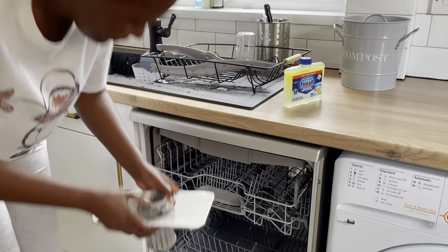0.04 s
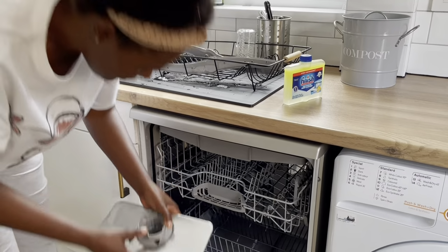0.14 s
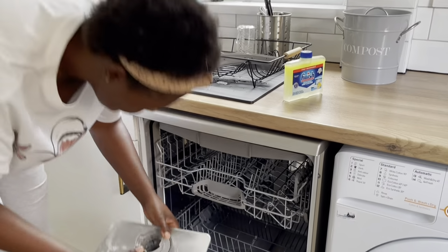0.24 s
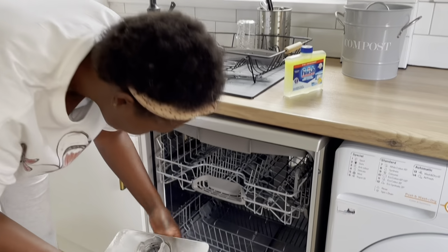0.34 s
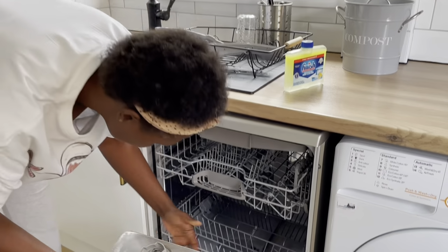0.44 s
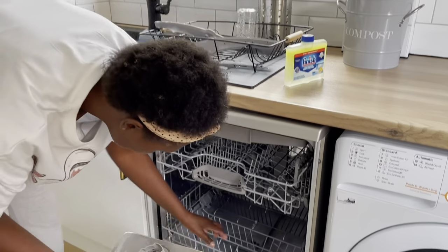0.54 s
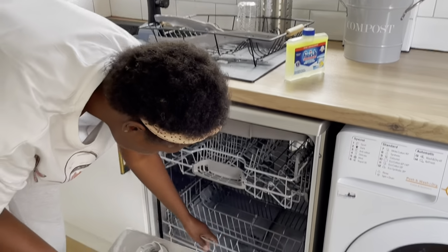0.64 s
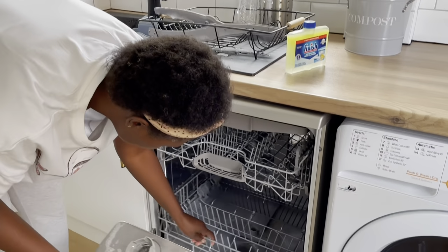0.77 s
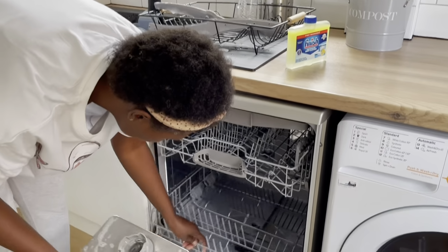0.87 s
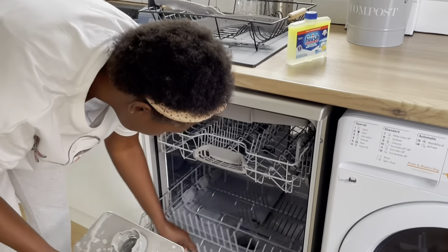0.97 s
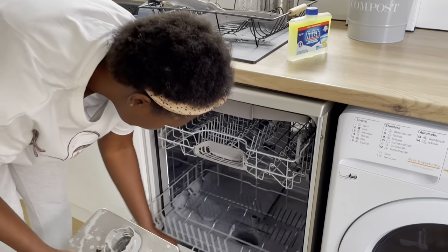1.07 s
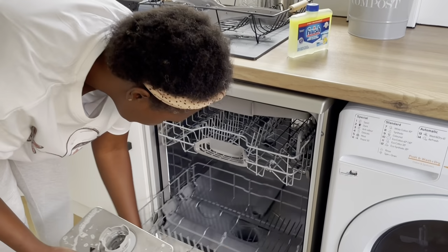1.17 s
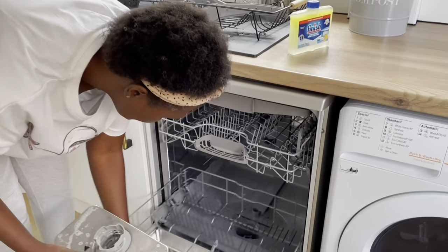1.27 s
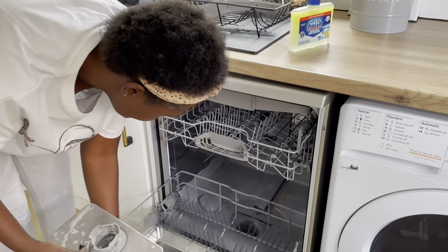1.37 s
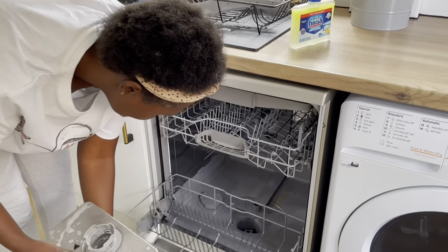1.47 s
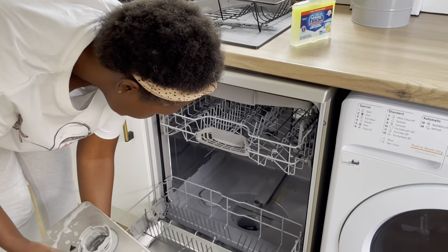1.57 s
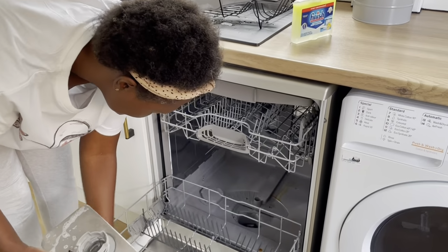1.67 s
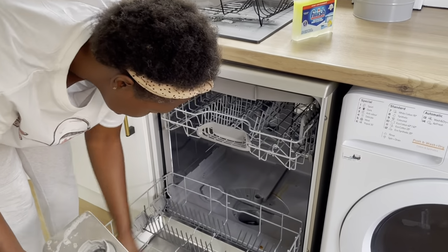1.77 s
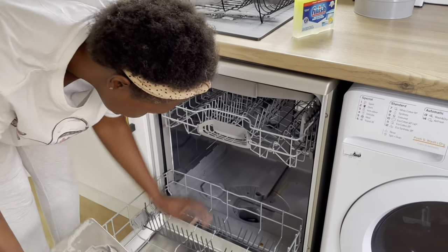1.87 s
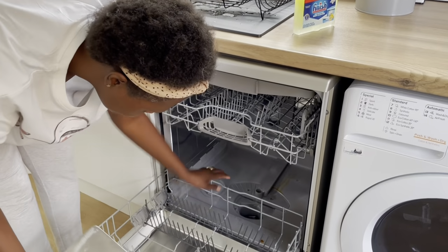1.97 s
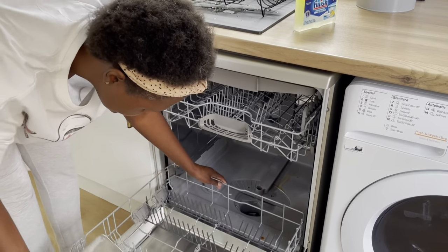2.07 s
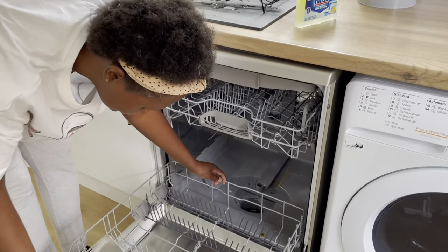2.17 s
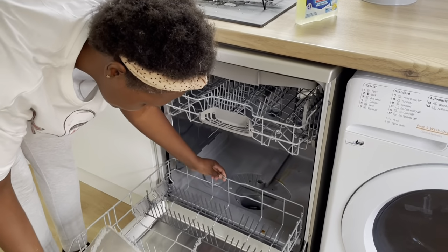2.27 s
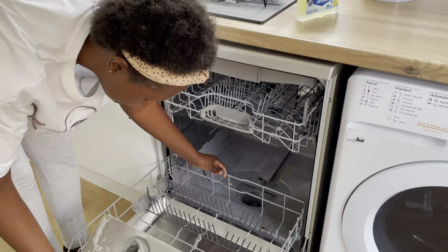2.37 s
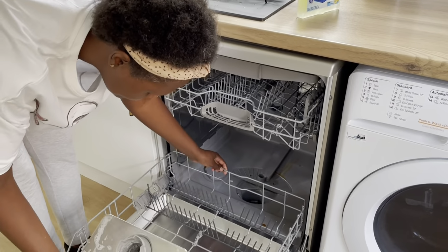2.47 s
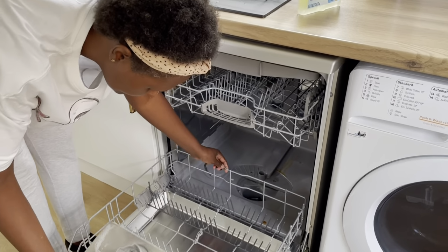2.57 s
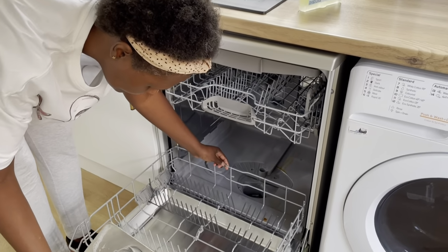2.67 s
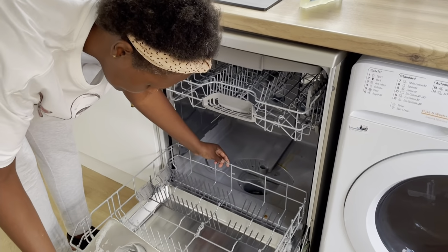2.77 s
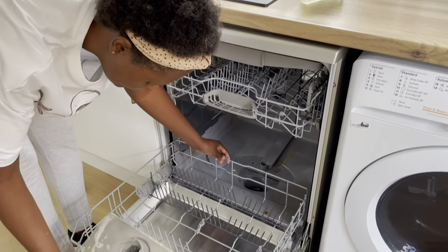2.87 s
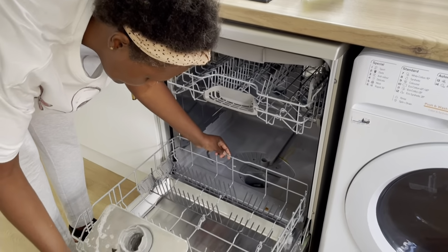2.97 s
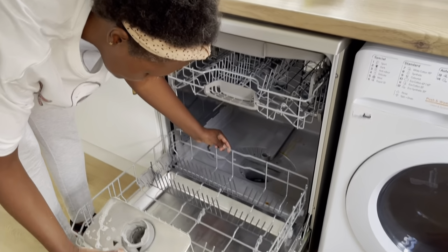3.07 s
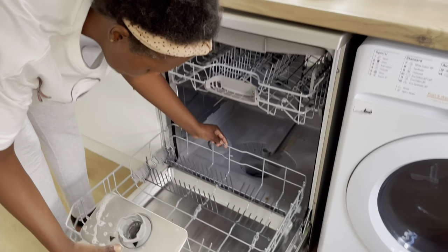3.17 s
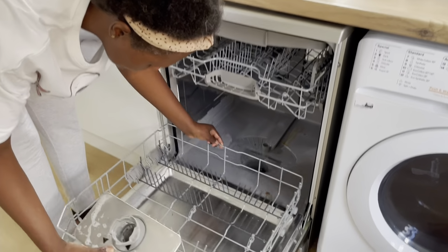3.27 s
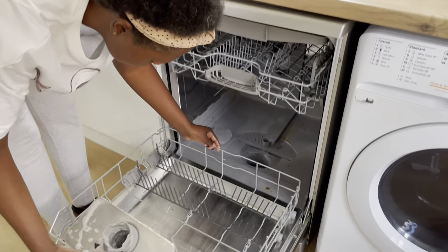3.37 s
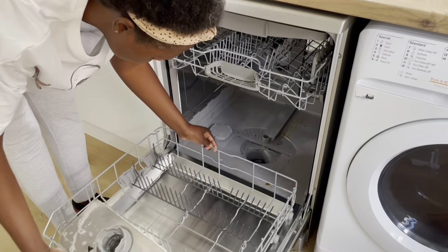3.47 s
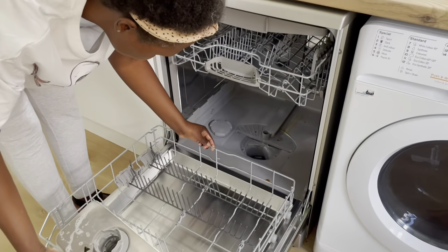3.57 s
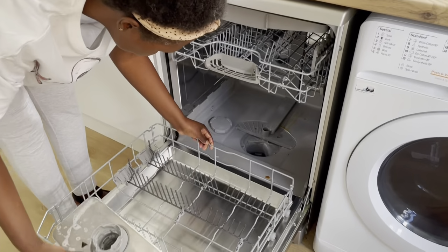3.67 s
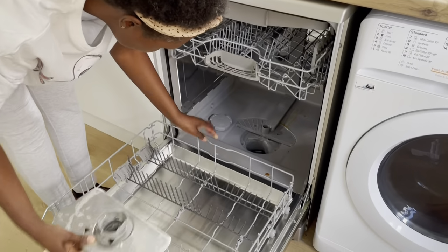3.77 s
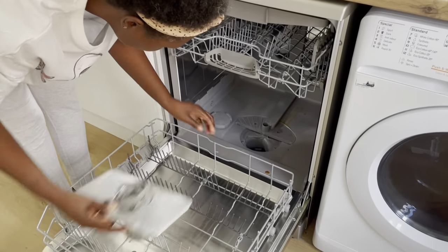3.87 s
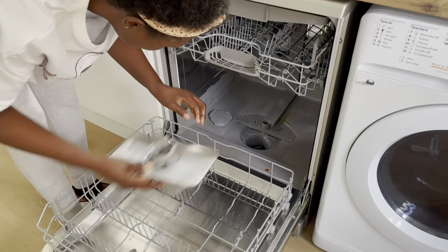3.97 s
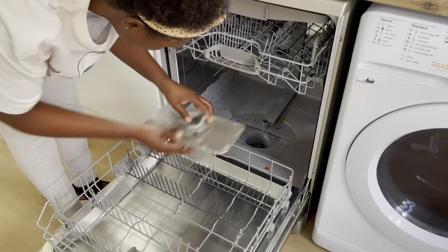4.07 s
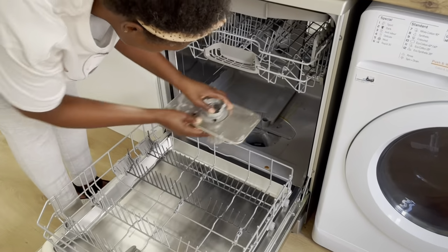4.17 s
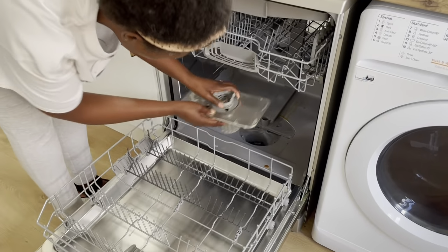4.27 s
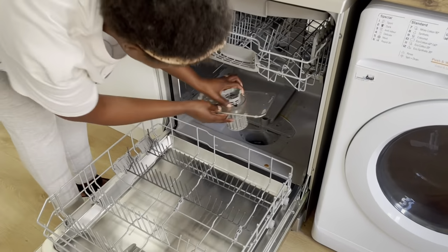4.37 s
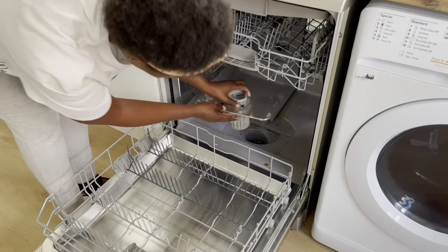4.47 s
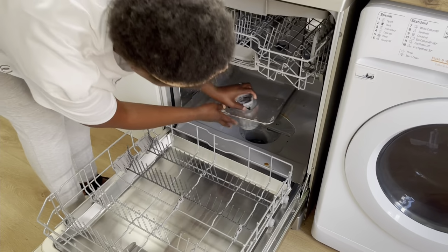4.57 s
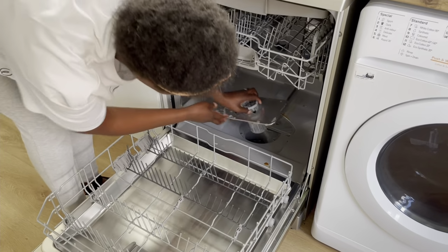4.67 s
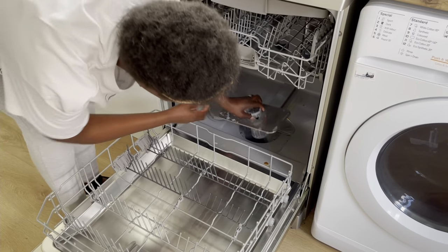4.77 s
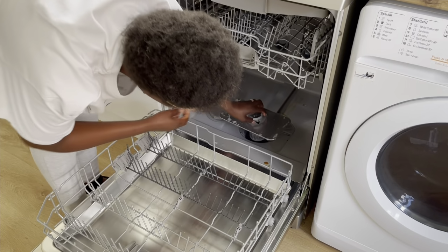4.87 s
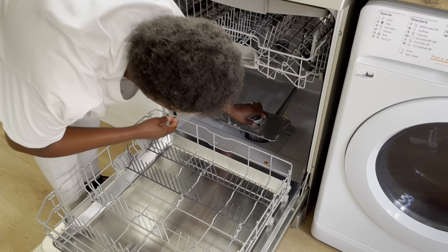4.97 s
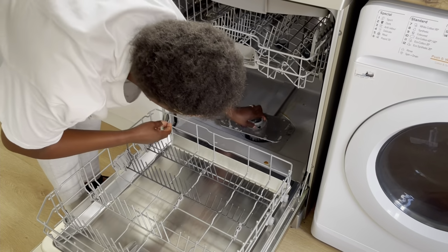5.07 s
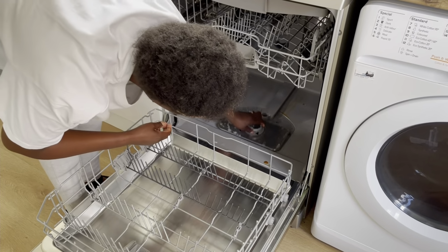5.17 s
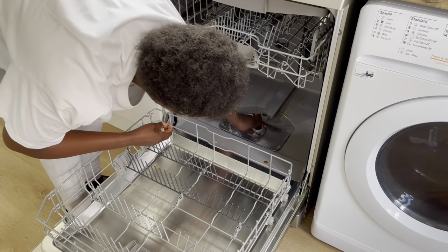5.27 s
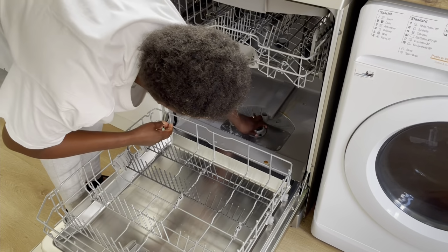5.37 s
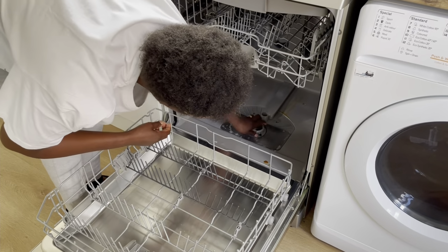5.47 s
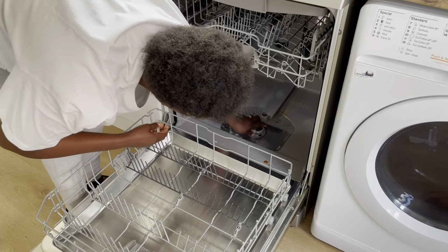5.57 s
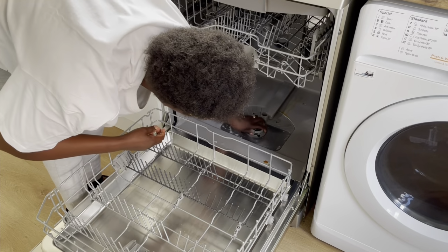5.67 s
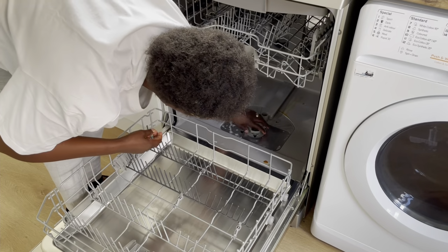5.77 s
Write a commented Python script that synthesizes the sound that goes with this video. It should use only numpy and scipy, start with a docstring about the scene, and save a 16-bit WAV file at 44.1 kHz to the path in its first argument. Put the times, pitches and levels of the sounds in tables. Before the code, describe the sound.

Close stereo sound in a small kitchen: soft clothing rustle and a dry plastic knock, then an empty wire dishwasher rack rolls out with low rumble, scrape and ringing bumps. A few metallic rattles follow, spaced by quiet. After faint handling, a plastic filter clatters and judders into its seat in the hollow steel tub, ending with a woody, hollow thunk. Short room echo and faint hiss.

```python
"""In a small kitchen a plastic filter is briefly handled, then a dishwasher's empty lower rack rolls out onto its door.
The rack's wheels are random grains and its bumps short noise bursts; both set the wire basket ringing.
Later the filter scrapes and clatters into its seat in the steel tub: dry knocks answered by tub resonances.
Low swelling notes, finger rubs and clothes rustle are added, with a short room echo and a quiet background hiss.
"""
import sys
import numpy as np
from scipy import signal
from scipy.fft import rfft, irfft
from scipy.io import wavfile
from scipy.ndimage import uniform_filter1d

SR = 44100
rng = np.random.default_rng(int(sys.argv[2]) if len(sys.argv) > 2 else 0)


def dump(signal):
    """Clip the signal to [-1, 1] and save it as 16-bit WAV at the path in sys.argv[1]."""
    limited = np.clip(np.atleast_2d(signal).T, -1, 1)
    pcm = np.round(limited * 32767).astype(np.int16)
    wavfile.write(sys.argv[1], SR, pcm)


N = 256662
TIME = np.arange(N) / SR

# knocks of the rack's wheels and wires: t/s, level/dB, then thump/dB, tick/dB, body ring/dB and note/dB
# (ring is a gain, the rest are relative to level), note f/Hz, midrange tilt/dB per octave, rebound after t/s or 0
RACK_KNOCKS = [ (.72, -46, -7, -38, -2, 5, 360, -6, 0), (.863, -35.5, -7, -23, -1, 1, 378, 0, .016),
               (.951, -29, -10, -19, 2, -6, 1100, 2.5, 0), (.964, -30, -9, -23, 2, -7, 1600, 2, 0),
               (1.073, -42, -5, -22, 0, -3, 900, 0, .018), (1.179, -45, -5, -22, 1, 0, 462, -1, 0),
               (1.254, -45, -5, -24, 1, 1, 355, -1, 0), (1.555, -41.5, -6, -18.5, 3, -2, 446, -1, 0),
               (1.564, -44, -6, -13, 0, -3, 700, 0, 0), (1.662, -32, -5, -12, 4, -6, 1792, 0, .015),
               (1.694, -31, -3, -11, 4, -13, 4188, -1, 0), (1.728, -28, -3, -14, 2.5, -4, 619, 0, 0),
               (1.762, -27, -2, -15, 2.5, -2, 645, -1, 0), (2.13, -27, -8, -15.5, 4, -2, 441, 1, 0),
               (2.148, -27.5, -6, -21, 2.5, -1, 650, -1, 0), (2.579, -30.5, -6, -19.5, 1.5, 0, 651, -2, 0),
               (2.639, -28, -8, -9.5, 3.5, -3, 877, 1, 0), (3.278, -28, -5.5, -13.5, 1.5, -3, 619, 0, 0),
               (3.384, -23.5, -9, -19, 1.5, -4, 721, 0, 0), (3.416, -28, 1, -11, 4, -7, 2449, 0, 0),
               (3.469, -26, -9, -17.5, 2.5, -6, 1491, -.5, 0), (3.927, -46, -8, -22, 5, -14, 2664, 0, 0),
               (3.958, -50, -5, -24, 2, -6, 1400, 0, 0), (4.109, -43, -15, -8, 3, -9, 1300, 0, 0),
               (4.128, -45, -9, -9, 0, 0, 400, 0, 0)]
# knocks of the plastic filter: same columns as the rack's knocks
FILTER_KNOCKS = [ (.186, -28.5, -7, -17.5, -9, -5, 420, 1.5, 0), (.431, -41, -4.5, -26, -6, -6, 775, 1, 0),
                 (4.024, -51, -4, -25, -2, -3, 800, 1, .02), (4.288, -54, -5, -23, -6, 1, 457, 0, 0),
                 (4.393, -53, -6, -13, -2, -2, 1760, 2, .018), (4.538, -57, -6.5, -6, -3, 1, 2550, 1, 0),
                 (5.068, -34.5, -11, -18, 2, -2, 554, 0, .025), (5.117, -34, -8, -15, 1, 0, 522, 0, 0),
                 (5.179, -30, -16, -4.5, 3, -5, 1356, 1.5, .018), (5.23, -18, -7, -13, 2, -5, 349, 0, .014),
                 (5.273, -24, -6, -15, 2, -3, 462, -.5, 0), (5.295, -23, -1, -16, 2, -2, 306, 0, 0),
                 (5.325, -26.5, -3, -25, 3, 0, 473, -1, 0), (5.354, -22, -4, -24, 1, -3, 371, 0, 0),
                 (5.581, -25.5, -4, -26, 2, 0, 457, 1.5, 0), (5.664, -39, -2, -26, 0, 1, 420, -3, 0)]
# how a rebound differs from its blow: changes of knock/dB, thump/dB, tick/dB, ring/dB, note/dB
REBOUND_CHANGE_DB = (-2, -1, -6.5, -1.5, -9)
# small bumps under the wheels: thump/dB, tick/dB, ring/dB, note/dB, as in the knock tables
BUMP_SHAPE_DB = (-6, -18, 3, -3)

# tone colour of each sound, only the shape counts: f/Hz, level/dB
RACK_COLOUR = [(30, -21), (65, -5.5), (120, 1), (220, 4), (380, -5), (460, -2.8), (600, -2), (1000, -8),
               (1700, -11), (2800, -14.5), (3500, -20.5), (4500, -21), (7000, -26), (11000, -30.5),
               (15500, -43)]
FILTER_COLOUR = [(30, -43), (65, -13.5), (115, -6), (190, -3), (320, -1), (520, 1), (850, -5), (1350, -7.5),
                 (2000, -15.5), (2800, -15), (3500, -21), (4500, -20.5), (7000, -27), (11000, -31.5),
                 (15500, -48)]
RUMBLE_COLOUR = [(30, -6), (70, 4.5), (110, 10), (220, -2), (400, 0.5), (650, -4), (1100, -20.5),
                 (2500, -58.5)]
GRIT_COLOUR = [(400, -6), (1000, 10), (2200, -3.5), (3200, -6.5), (4000, -13.5), (6000, -21), (15000, -30)]
CLOTH_COLOUR = [(80, 8.5), (500, 9), (1000, -2.5), (2200, 2), (4000, -9), (7000, -11), (11000, -14.5),
                (15500, -20.5)]
QUIET_COLOUR = [(25, 0), (60, 4), (120, -1), (300, -6), (700, -14), (2000, -20), (5000, -27), (15000, -38)]

# clear resonances of the rack and of the steel tub: f/Hz, relative level/dB, time to fall 60 dB t/s
RACK_MODES = [(110, -2.5, .26), (199, 6, .5), (224, -3, 1.2), (250, -9, .9), (310, -5, .6), (442, 3, .23),
              (513, -1, .35), (570, 0, .25), (640, -2, .35), (738, -2, .25), (870, 5, .25), (1050, -2, .35),
              (1115, 0, .35), (1255, -1, .33), (1355, 0, .3), (1780, 2, .4), (2680, 4, .39)]
TUB_MODES = [(63, -1, .4), (150, -5, .18), (228, -6, .9), (312, 5, .4), (347.5, 3, .3), (454.6, 0, .3),
             (530, 3, .4), (692, 2, .33), (789, 4, .25), (833, -1, .4), (958, -6, .45), (1096, -1, .4),
             (1312, 3, .25), (1376, 1, .2), (1500, 0, .2), (1678, -3, .37)]
# dense ringing of the wires, the tub and the room: f/Hz, time to fall 60 dB t/s, relative level/dB
WIRE_RING = [(59, 1.77, 3), (126, 1.01, 3), (250, 1.49, 0), (495, 0.86, -0.5), (990, 0.55, -1.5),
             (2430, 0.62, 2.5), (5300, 0.41, 6), (12000, 0.44, 1)]
TUB_RING = [(60, 0.82, 4.5), (247, 0.41, -1), (1000, 0.57, -1.5), (2500, 0.35, 1.5), (5000, 0.52, 1.5),
            (12200, 0.29, 0)]
KITCHEN_RING = [(125, .75, 0), (1000, 0.22, 0), (12000, 0.45, 0)]
# notes of the filter plate and tub floor at the last push: f/Hz, level/dB, time to fall 60 dB t/s, rise t/ms
SEAT_MODES = [(64, -36, .3, 12), (199, -29, .2, 10), (237, -11.5, .11, 14), (312, -29, .25, 8),
              (457, -22.5, .14, 2), (515, -19.5, .09, 2), (867, -38, .11, 2), (1094, -31, .1, 2),
              (1445, -38, .12, 2)]
# low swelling notes of the filter plate, the knocked wire rack and the steel door or tub: t/s, f/Hz, peak level/dB
LOW_NOTES = [(.02, 400, -34), (.079, 360, -34), (.45, 108.4, -38.5), (.96, 125, -36), (1.355, 97, -39),
             (2.158, 199, -26.5), (2.584, 200, -32.5), (2.655, 203, -33.5), (3.417, 133.5, -28),
             (3.475, 195, -33), (5.088, 66, -35), (5.236, 190, -23), (5.364, 103, -24.5)]

# rack scraping along its guides: peak t/s, level/dB, t to rise 20 dB/s, t to fall 20 dB/s
SCRAPES = [(.72, -53, .025, .1), (.835, -48, .08, .2), (.925, -47.5, .06, .1), (.99, -46, .1, .47),
           (1.46, -53, .06, .15), (1.775, -38.5, .15, .13)]
# clothes rustling with each bend and reach: same columns as the scrapes
MOVES = [(.01, -50, .3, .62), (.45, -49.5, .3, .12), (.73, -59, .15, .2), (1.42, -54, .9, 1.17),
         (2.015, -60, .03, .8), (4.05, -64.5, .2, 1.6), (4.5, -58.5, .9, 1.0), (5.74, -52, .36, .5)]
# tiny ticks as the filter shifts in the hands: same columns as the scrapes
FUMBLES = [(.26, -53, .4, .35), (4.04, -61, .03, .6)]
# wheels creaking as they break free: columns of the scrapes, then f/Hz
WHEEL_CREAKS = [(.727, -47, .028, .06, 720), (.765, -47, .06, .08, 470)]
# filter juddering as it is twisted into its seat: columns of the scrapes, then f/Hz
JUDDERS = [(5.312, -27, .12, .09, 340), (5.35, -30, .08, .05, 520)]
# fingers rubbing the filter's plate as the grip shifts: columns of the scrapes, then plate f/Hz
GRIPS = [(.05, -42.5, .3, .2, 340), (.26, -51, .04, .07, 560), (.345, -52, .06, .07, 500),
         (.435, -50.5, .06, .07, 470), (4.24, -58, .05, .08, 520), (4.48, -61, .08, .12, 600)]

# the two microphone openings, gain of the left-right difference: f/Hz, level/dB
STEREO_WIDTH = [(60, -19), (125, -17.5), (250, -9.5), (500, -3.5), (1500, -2), (5000, -4), (7000, -3.5),
                (8200, -22.5), (9800, 2.5), (11500, -27), (13000, -3.5), (15000, -15)]
# how far the left opening is ahead of the right: f/Hz, phase/rad
LEFT_LEAD = [(5500, 0), (7000, 1.3), (7800, 3.0), (8600, 3.25), (10000, 4.9), (11000, 6.15), (12100, 6.4),
             (13300, 7.5), (14000, 9.38), (16000, 9.44)]

# one steady pull: the rolling sound starts, rises over the attack, then fades from the stop on
ROLL_START_S, ROLL_ATTACK_S, ROLL_STOP_S, ROLL_RELEASE_S = .685, .022, 1.756, .15
GATHER_S, GATHER_DB = .25, 2.5  # time to reach full speed; how much quieter the rolling starts
RUMBLE_DB, GRIT_DB = -45.5, -58
SLOW_GRIT_HZ = 1800  # a slow scrape stays mostly below this; treble joins with speed
DOOR_S, DOOR_DB = 1.57, 5.5  # the rumble grows as the wheels run onto the hollow door
BUMPS_PER_S, LOUDEST_BUMP_DB, LOWEST_BUMP_HZ, BUMP_TILT_DB = 7, -49.5, 450, -1.5  # tilt per octave
NOTE_DB, NOTE_T60_S = -16, .025  # each struck spot also rings briefly on its own note
FIRM_TICK_DB, SOFT_MS_PER_DB = -20, .34  # blows with less tick than this rise more slowly
LOW_NOTE_RISE_CYCLES = 2.16
SEAT_S = 5.582
QUIET_DB = -67.5
TOP_HZ = 14400


def rack():
    """Wheels rumble, bump and scrape along their track, and this shaking sets the wire basket ringing."""
    blows = knocks(RACK_KNOCKS, rise_ms=.26) + knocks(bumps(), rise_ms=1.2)
    direct, spots = strike(blows, RACK_COLOUR, gains_db=(-13.5, -11.5, -10.5), t60s=(.04, .07, .035),
                           snap=9.7, spread=.82, lag=1.756, rattle=.65)
    speed = np.clip((TIME - ROLL_START_S) / GATHER_S, 0, 1)
    fade_in = (TIME - ROLL_START_S) / ROLL_ATTACK_S
    fade_out = 1 - (TIME - ROLL_STOP_S) / ROLL_RELEASE_S
    rolling = np.clip(np.minimum(fade_in, fade_out), 0, 1) * undb(-GATHER_DB * (1 - speed))
    rumble = wheel_rumble(rolling)
    grit = guide_grit(rolling, speed)
    # every spot of the basket stirs its own mixture of wire notes; the clear modes answer all spots
    drives = spots + undb(-11.5) * grit[:1]
    wires = sum(resonate(drive, dense_ring(WIRE_RING)) for drive in drives)
    bending = resonate(spots.sum(axis=0) + undb(-2.5) * rumble, mode_ring(RACK_MODES))
    return direct + rumble + grit + creaks(WHEEL_CREAKS) + undb(-1.0) * wires + undb(-17.5) * bending


def wheel_rumble(rolling):
    """Many tiny hits under the rolling wheels blur into a low rumble, louder on the hollow door."""
    on_door = uniform_filter1d(1. * (TIME > DOOR_S), size=2048)
    rumble = unit(colour(grains(rate=2000, scatter_db=2.0), RUMBLE_COLOUR))
    return rumble * rolling * undb(RUMBLE_DB + DOOR_DB * on_door)


def guide_grit(rolling, speed):
    """Sparse hits make a gritty scrape along the guides, brighter at higher speed."""
    grit = unit(colour(grains(rate=520, scatter_db=3.0), GRIT_COLOUR))
    grit = grit * np.hypot(rolling * speed * undb(GRIT_DB), swells(SCRAPES))
    treble = butter(grit, SLOW_GRIT_HZ, "high")
    grit = butter(grit, SLOW_GRIT_HZ, "low") + speed ** 2 * treble
    return grit * flutter(rate=45, depth_db=2.2)  # the wheels catch and run free


def bumps():
    """Wheels at full speed meet small bumps: one at a chance moment in each equal slot before the door."""
    start = ROLL_START_S + GATHER_S
    count = round(BUMPS_PER_S * (DOOR_S - start))
    table = []
    for k, (when, weak, spot) in enumerate(rng.random((count, 3))):
        s = start + (k + when) / BUMPS_PER_S
        note_hz = LOWEST_BUMP_HZ * 2 ** spot
        table.append((s, LOUDEST_BUMP_DB - 6 * weak, *BUMP_SHAPE_DB, note_hz, BUMP_TILT_DB, 0))
    return table


def plastic_filter():
    """Dry plastic knocks and juddering shake the air; the knocks also ring the hollow steel tub."""
    blows = knocks(FILTER_KNOCKS, rise_ms=.55)
    direct, spots = strike(blows, FILTER_COLOUR, gains_db=(-13.5, -11, -10), t60s=(.05, .07, .04),
                           snap=6.8, spread=.34, lag=1.307, rattle=.61)
    hollow = sum(resonate(drive, dense_ring(TUB_RING)) for drive in spots)
    walls = resonate(spots.sum(axis=0), mode_ring(TUB_MODES))
    return direct + creaks(JUDDERS) + undb(-1.5) * hollow + undb(-16.5) * walls


def seat(size=16384):
    """Pressing the filter home gives a quick woody knock of its plate and a slower hollow tub note."""
    out, t = np.zeros((2, N)), np.arange(size) / SR
    for hz, db, t60, rise_ms in SEAT_MODES:
        envelope = (1 - np.exp(-t * 1000 / rise_ms)) * decay(t, t60)
        phase = rng.uniform(-.4, .4, (2, 1))
        add(out, SEAT_S, undb(db) * envelope * np.sin(2 * np.pi * hz * t + phase))
    return out


def low_notes(size=16384):
    """Filter plate, wire rack and steel door or tub swell and die away on low notes; lower ones are slower."""
    out, t = np.zeros((2, N)), np.arange(size) / SR
    for s, hz, db in LOW_NOTES:
        rise = LOW_NOTE_RISE_CYCLES / hz
        envelope = t / rise * np.exp(1 - t / rise)
        add(out, s, (undb(db) * envelope * np.sin(2 * np.pi * hz * t))[None])
    return out


def grip():
    """Fingertips rub the thin plate, which answers with a low creak and tiny dry ticks."""
    ticks = colour(grains(rate=420, scatter_db=2.0), FILTER_COLOUR)
    ticks = unit(butter(ticks, hz=850, kind="high"))
    return creaks(GRIPS) + ticks * swells(FUMBLES)


def clothes():
    """Cotton sliding over itself makes countless tiny hits: a fine rustle that swells with each move."""
    rustle = unit(colour(grains(rate=5000, scatter_db=1.5), CLOTH_COLOUR))
    return rustle * swells(MOVES) * flutter(rate=25, depth_db=1.3)


def kitchen_echo(near):
    """The room answers with a short, dense echo, unrelated left and right."""
    return undb(-17) * resonate(near, dense_ring(KITCHEN_RING))


def quiet_background():
    """Steady, faint noise with more bass than treble."""
    return undb(QUIET_DB) * unit(colour(rng.standard_normal((2, N)), QUIET_COLOUR))


def knocks(table, rise_ms):
    """Dull blows rise slowly and loose parts fall back once; gives a list of blows for strike."""
    blows = []
    for s, db, thump_db, tick_db, ring_db, note_db, note_hz, tilt_db, rebound_s in table:
        rise = rise_ms + SOFT_MS_PER_DB * max(FIRM_TICK_DB - tick_db, 0)
        levels_db = np.array([db, db + thump_db, db + tick_db, ring_db, db + note_db])
        blows.append((s, *levels_db, note_hz, tilt_db, rise))
        if rebound_s > 0:
            blows.append((s + rebound_s, *(levels_db + REBOUND_CHANGE_DB), note_hz, tilt_db, rise))
    return blows


def strike(blows, spectrum, gains_db, t60s, snap, spread, lag, rattle, count=4):
    """Each blow is heard directly, and also pushes the body at one of a few spots."""
    direct, spots = np.zeros((2, N)), np.zeros((count, 1, N))
    for k, (s, *levels_db, ring_db, note_db, note_hz, tilt_db, rise_ms) in enumerate(blows):
        bands_db = np.add(levels_db, gains_db)
        heard, push = contact(spectrum, bands_db, tilt_db, rise_ms, t60s, snap, spread)
        t = TIME[:heard.shape[1]]
        note = (1 - np.exp(-t * note_hz)) * decay(t, NOTE_T60_S) * np.sin(2 * np.pi * note_hz * t)
        heard = heard + undb(NOTE_DB + note_db) * unit(note)
        # the chatter pushes too, so each blow favours its own resonances
        push = np.sqrt(1 - rattle) * push + np.sqrt(rattle) * heard.mean(axis=0)
        add(direct, s, disperse(heard, lag))
        add(spots[k % count], s, disperse(push, lag) * undb(ring_db))
    return direct, spots


def contact(spectrum, levels_db, tilt_db, rise_ms, t60s, snap, spread, size=6144):
    """A blow is a snap plus noisy chatter in three bands (knock, thump, tick), and a push into the body."""
    t = np.arange(size) / SR
    sides = np.array([[1], [-1]])
    mid, side = rng.standard_normal((2, size))
    chatter = (1 - np.exp(-t * 1000 / rise_ms)) * (mid + spread * side * sides)
    chatter[:, 0] += snap * np.exp(-rise_ms)  # a soft contact swells and has little snap
    force = np.vstack([chatter, t == 0])  # the third row is a single click: the push
    # the harder the contact, the further its tick reaches into the top treble
    hardness_db = .33 * (levels_db[2] - levels_db[0] + 13.0)
    shaped = []
    for hz, db in spectrum:
        treble_db = hardness_db * max(np.log2(hz / 4500), 0)
        midrange_db = tilt_db * np.log2(np.clip(hz, 300, 2500) / 1000)
        shaped.append((hz, db + treble_db + midrange_db))
    bands = [([300, 2500], "band"), (300, "low"), (2500, "high")]
    heard, push = 0, 0
    for (hz, kind), db, t60 in zip(bands, levels_db, t60s):
        part = butter(colour(force * decay(t, t60), shaped), hz, kind)
        heard = heard + undb(db) * unit(part[:2])
        push = push + undb(db) * unit(part[2:])
    return heard, push


def disperse(x, lag):
    """Bending waves carry the treble first and the bass late; a larger lag spreads them further apart."""
    size = x.shape[1]
    khz = np.arange(size // 2 + 1) * SR / size / 1000
    delay_ms = lag * np.maximum((khz + .02) ** -.5 - .35, 0) + .15
    fade = np.minimum(np.linspace(2, 0, size), 1) ** 2
    # adding up the delays over frequency gives the phase shift
    return fade * irfft(rfft(x) * np.exp(-2j * np.pi * np.cumsum(delay_ms) * khz[1]))


def creaks(table):
    """Plastic sticks and slips: dense little pulses in one resonance for each rub."""
    out = 0
    for *rub, hz in table:
        pulses = grains(rate=500, scatter_db=1.5)[:1]
        out = out + unit(butter(pulses, [.73 * hz, 1.37 * hz], "band")) * swells([rub])
    return out


def grains(rate, scatter_db):
    """Rough surfaces touch in tiny random hits of very unequal size, about rate per second on each side."""
    hits = rng.random((2, N)) < rate / SR
    return hits * rng.standard_normal((2, N)) * undb(scatter_db * rng.standard_normal((2, N)))


def swells(table):
    """Loudness of sliding movements that build to a peak and die away; their powers add."""
    power = 0
    for s, db, rise, fall in table:
        drop_db = 20 * np.maximum((s - TIME) / rise, (TIME - s) / fall)
        power = power + undb(db - drop_db) ** 2
    return np.sqrt(power)


def flutter(rate, depth_db):
    """Loudness that wavers at random, about rate times a second."""
    hold = int(SR / rate)
    steps = np.repeat(rng.standard_normal(N // hold + 1), hold)
    return undb(depth_db * uniform_filter1d(steps, hold // 2)[:N])


def dense_ring(table, size=65536, count=10):
    """Countless close resonances: noise in octave bands that each die away at their own rate."""
    t, hz = np.arange(size) / SR, np.arange(size // 2 + 1) * SR / size
    table = np.array(table)
    noise = rfft(rng.standard_normal((2, size))) * undb(read(table[:, [0, 2]], hz))
    octave = np.clip(np.log2(np.maximum(hz, 1) / 31.25), 0, count - 1)
    ring = 0
    for k in range(count):
        t60 = read(table[:, :2], 31.25 * 2 ** k)
        band = irfft(noise * np.maximum(1 - abs(octave - k), 0))
        ring = ring + band * decay(t, t60)
    ring = ring * (1 - np.exp(-t / .0022))  # the vibration needs a moment to spread
    return ring / np.sqrt(np.sum(ring ** 2) / 2)


def mode_ring(modes, size=65536):
    """A few clear resonances ring as fading sine waves, each with its own phase left and right."""
    t = np.arange(size) / SR
    ring = 0
    for hz, db, t60 in modes:
        phase = rng.uniform(-.62, 1, (2, 1))
        ring = ring + undb(db) * decay(t, t60) * np.sin(2 * np.pi * hz * t + phase)
    return ring / np.sqrt(np.sum(ring ** 2) / 2)


def resonate(force, response):
    """What a body sounds like when the force (its first channel) drives it."""
    return signal.fftconvolve(force[:1], response, axes=-1)[:, :N]


def decay(t, t60):
    """Steady dying away that falls 60 dB in t60 seconds."""
    return np.exp(-np.log(1000) * t / t60)


def undb(db):
    """Turn decibels into a plain multiplier."""
    return 10 ** (np.asarray(db) / 20)


def unit(x):
    """Scale to an average strength (rms) of 1."""
    return x / np.sqrt(np.mean(x ** 2))


def read(table, hz):
    """Look up a value between table points, with frequency spaced by octaves."""
    f, value = np.transpose(table)
    return np.interp(np.log(np.maximum(hz, 1)), np.log(f), value)


def colour(x, table):
    """Give a sound the tone colour in a table, with a filter that never sounds ahead of its input."""
    size = 2048
    gain = undb(read(table, np.arange(size // 2 + 1) * SR / size))
    # folding the cepstrum (the transform of the log gain) makes the filter respond at once
    cepstrum = irfft(np.log(gain))
    cepstrum[1:size // 2] *= 2
    cepstrum[size // 2 + 1:] = 0
    response = irfft(np.exp(rfft(cepstrum)))
    return signal.oaconvolve(x, response[None], axes=-1)[:, :x.shape[-1]]


def butter(x, hz, kind):
    """Keep the low, high or middle part of a sound, with a third-order filter design."""
    return signal.sosfilt(signal.butter(3, hz, kind, fs=SR, output="sos"), x)


def add(track, s, sound):
    """Mix a sound in at time s."""
    start = max(int(s * SR), 0)
    track[:, start:start + sound.shape[1]] += sound[:, :N - start]


def scene():
    """All sources, the kitchen's short echo and its quiet background."""
    near = rack() + plastic_filter() + seat() + low_notes() + grip() + clothes()
    return near + kitchen_echo(near) + quiet_background()


def record(dry):
    """Two close openings hear the bass nearly alike and the treble out of step; the very top is cut."""
    hz = np.arange(N // 2 + 1) * SR / N
    left, right = rfft(dry)
    sides = np.array([[1], [-1]])
    middle = (left + right) / 2
    difference = (left - right) / 2 * undb(read(STEREO_WIDTH, hz))
    lead = np.interp(hz, *np.transpose(LEFT_LEAD))
    pair = (middle + sides * difference) * np.exp(1j * sides * lead / 2)
    top_cut = signal.ellip(8, .2, 70, TOP_HZ, fs=SR, output="sos")
    return signal.sosfilt(top_cut, irfft(pair, N))


dry = scene()
out = record(dry)
dump(out)
```